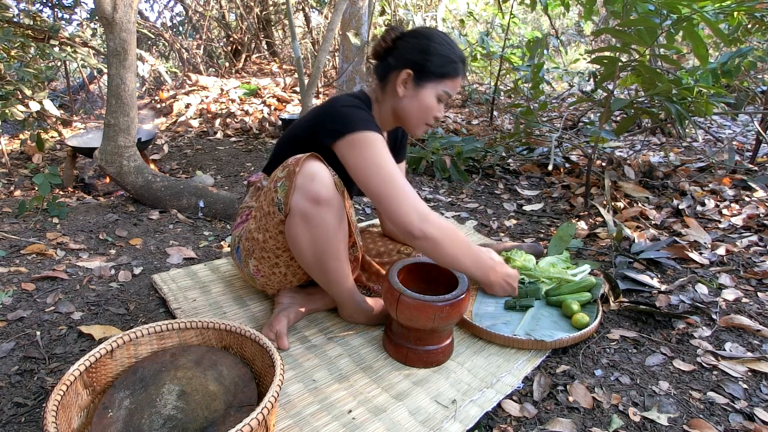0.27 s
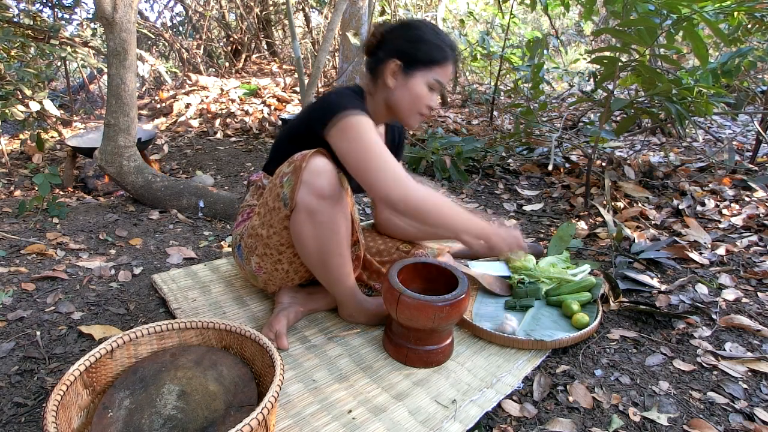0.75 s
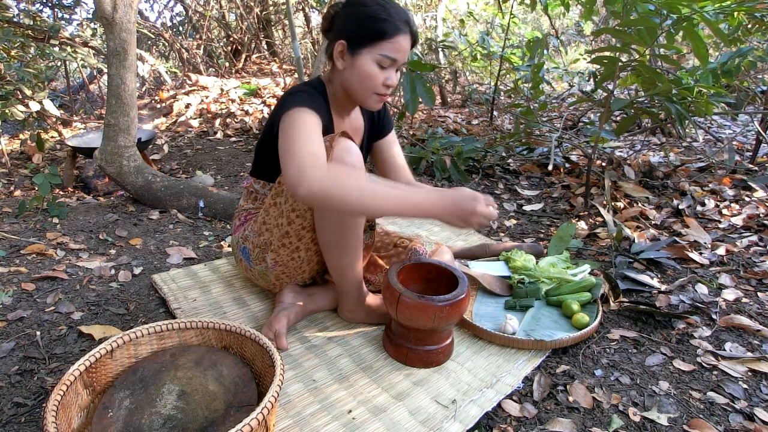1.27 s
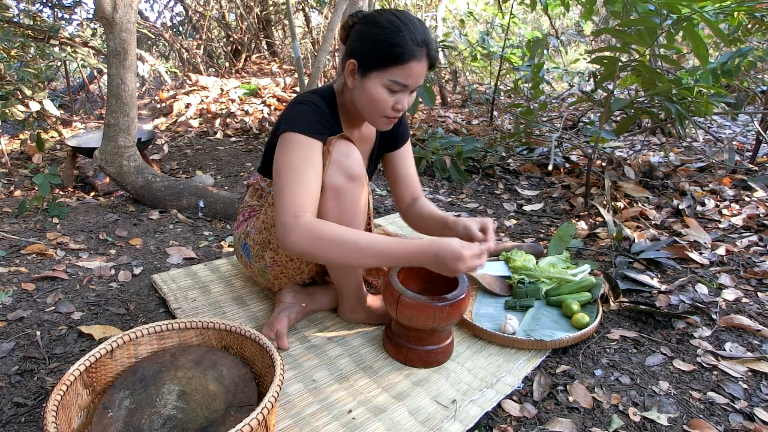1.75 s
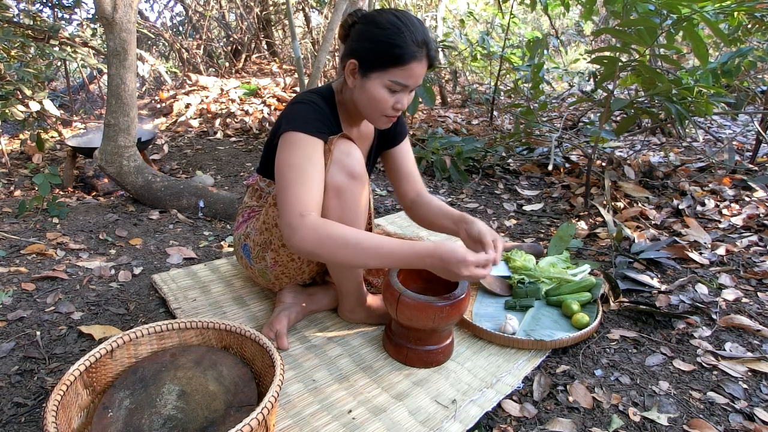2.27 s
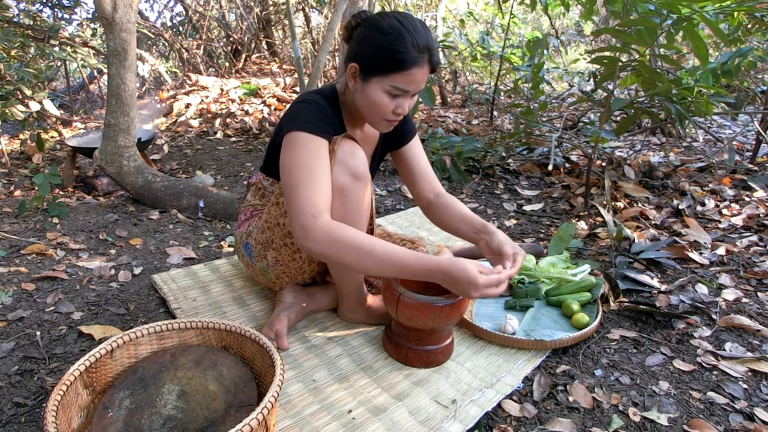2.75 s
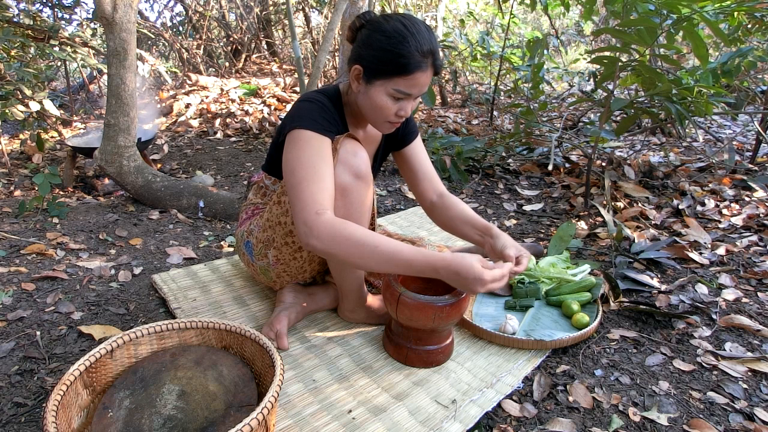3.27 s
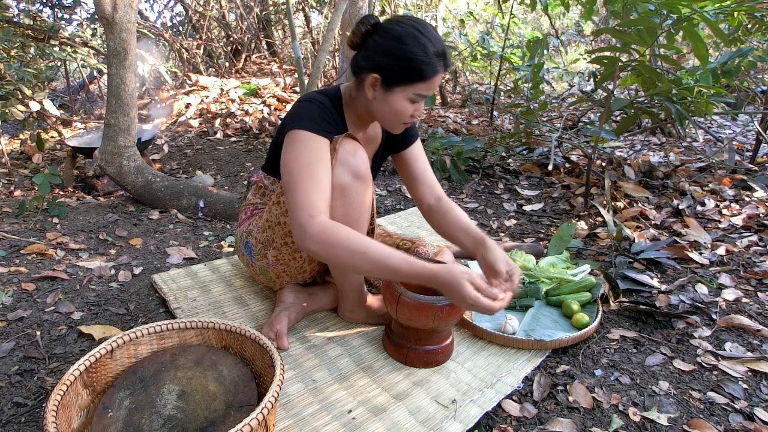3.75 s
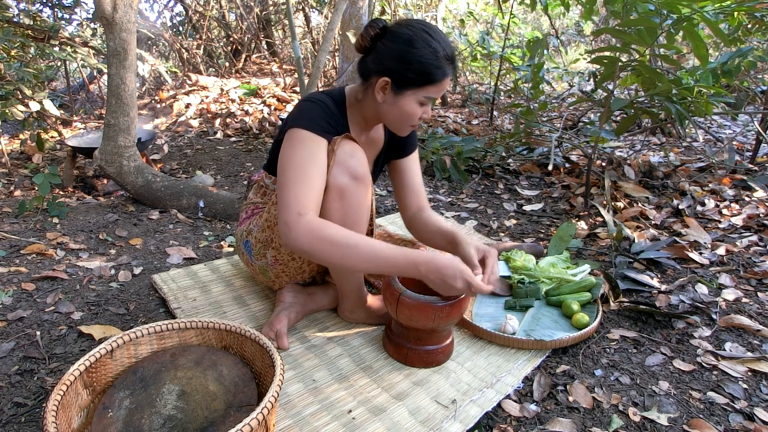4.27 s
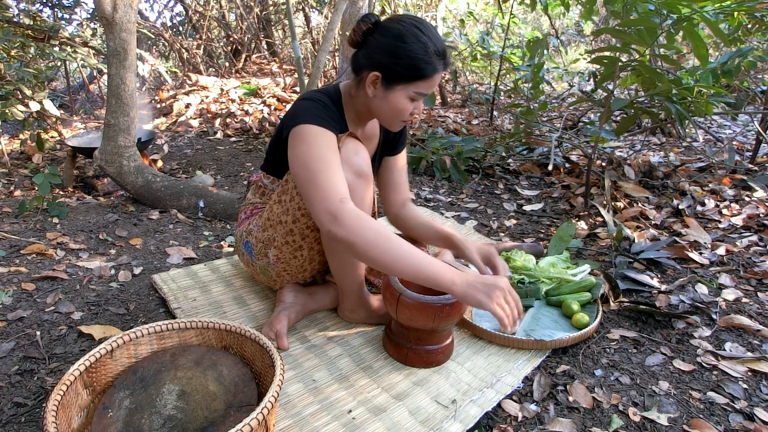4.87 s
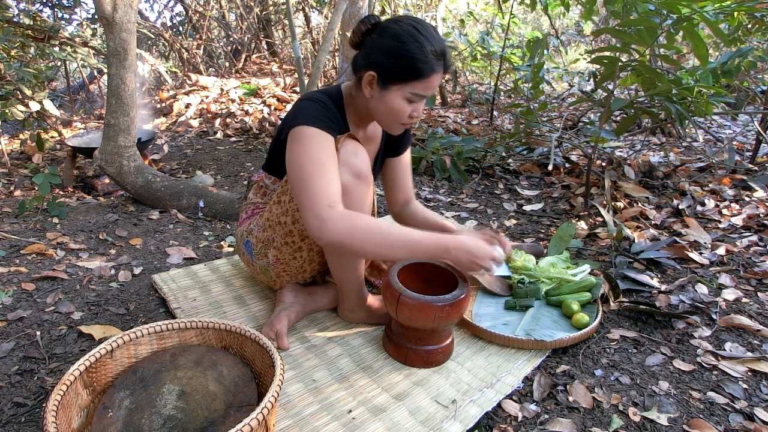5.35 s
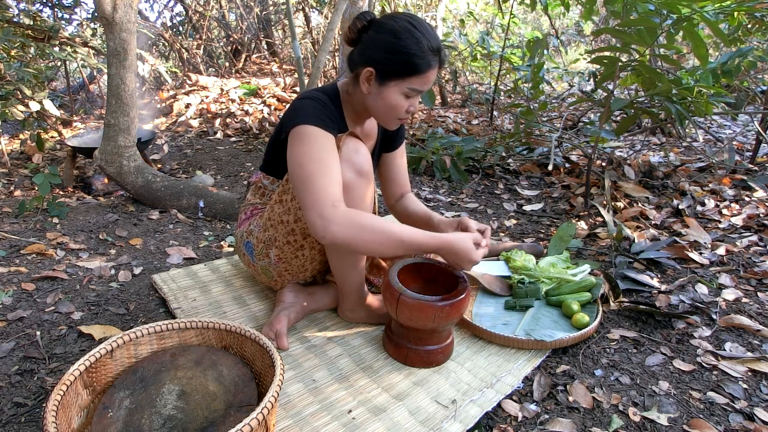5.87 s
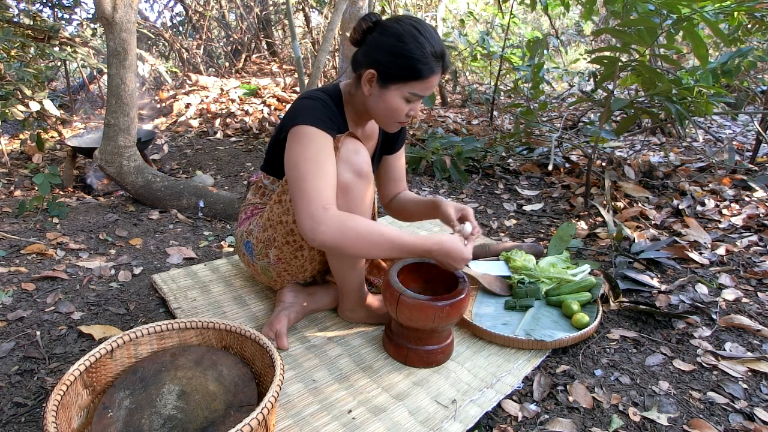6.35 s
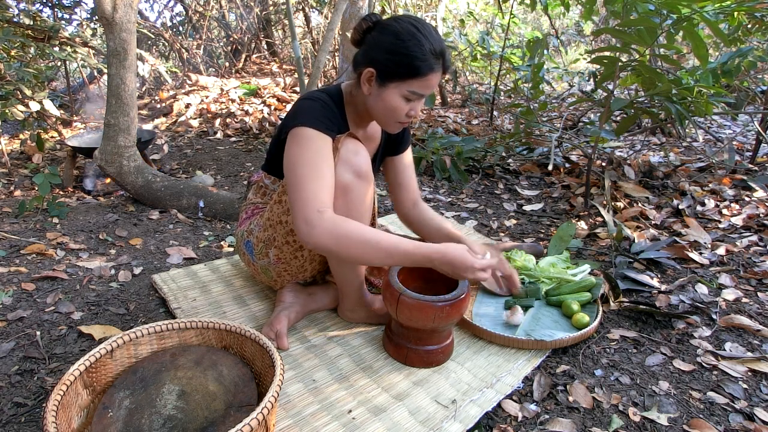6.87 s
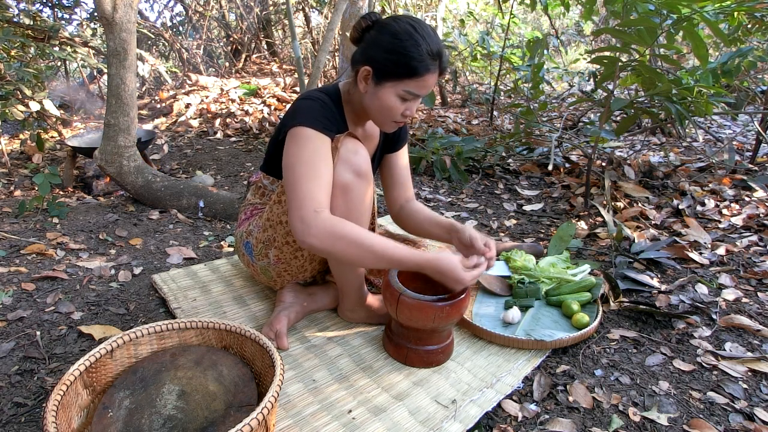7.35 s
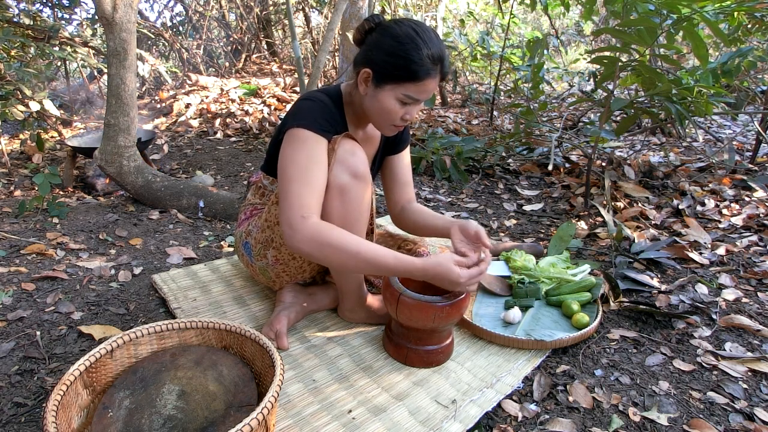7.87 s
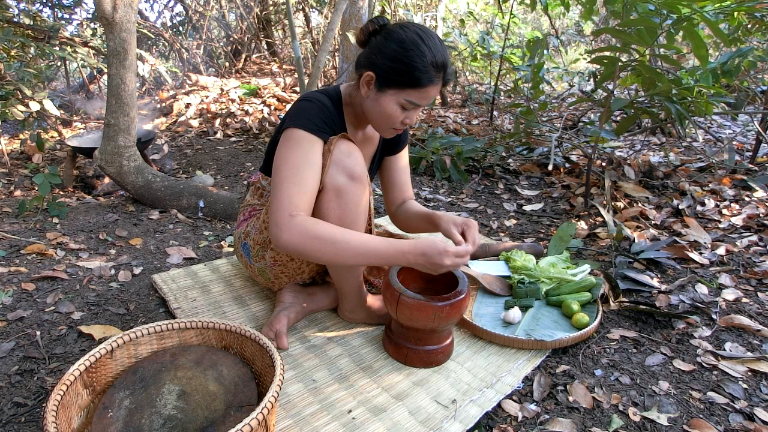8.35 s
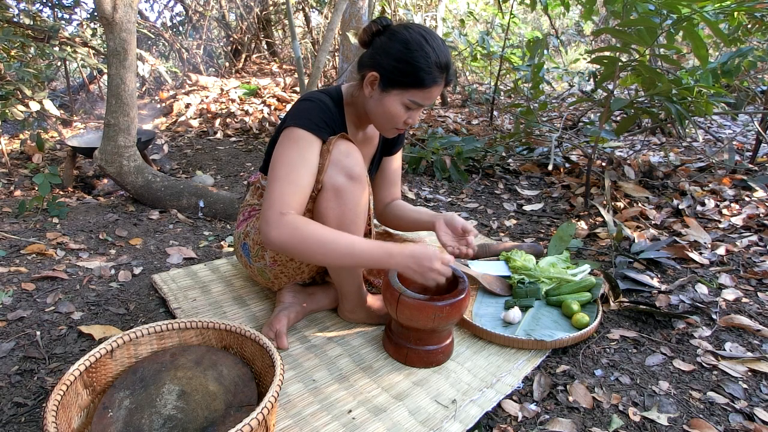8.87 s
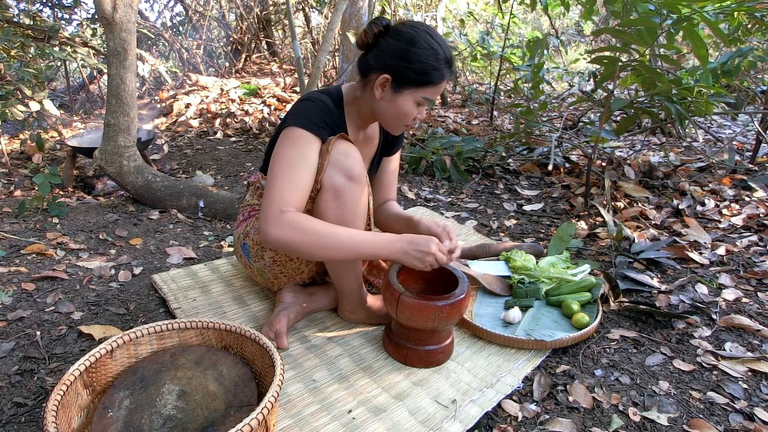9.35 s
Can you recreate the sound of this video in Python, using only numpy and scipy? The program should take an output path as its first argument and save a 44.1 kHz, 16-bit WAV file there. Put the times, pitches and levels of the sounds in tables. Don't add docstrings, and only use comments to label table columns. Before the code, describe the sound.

Papery garlic skins snap and crackle close by while a bird repeats falling whistles and others trill in threes through dry, insect-humming woodland.

```python
import sys
import numpy as np
from scipy import signal
from scipy.fft import rfft, irfft
from scipy.io import wavfile
from scipy.ndimage import uniform_filter1d

SR = 44100
rng = np.random.default_rng(int(sys.argv[2]) if len(sys.argv) > 2 else 0)


def generate_wav(signal):
    frames = np.transpose(np.atleast_2d(signal))
    scaled = np.clip(frames, -1, 1) * 32767
    pcm = np.round(scaled).astype(np.int16)
    wavfile.write(sys.argv[1], SR, pcm)


def voltage_ratio(decibels):
    exponent = np.asarray(decibels, float) / 20
    return 10 ** exponent


N = 423801

# time in seconds, pitch in Hz, level in dB.
TRILL_NOTE = [
    (0, 5600, -31),
    (.004, 5330, 2),
    (.009, 5100, 8.5),
    (.015, 4740, 5),
    (.021, 4540, -0.5),
    (.03, 4140, -9),
]


def colour(x, points):
    hz, db = np.transpose(points)
    f = np.fft.rfftfreq(x.shape[-1], 1 / SR) + 1
    gain_db = np.interp(np.log(f), np.log(hz), db)
    return irfft(rfft(x) * voltage_ratio(gain_db), x.shape[-1])


def band(x, hz, width):
    edges_hz = [hz / width, min(hz * width, .45 * SR)]
    return signal.sosfilt(signal.butter(2, edges_hz, "band", fs=SR, output="sos"), x)


def unit(x):
    return x / np.sqrt(np.mean(x ** 2))


def add(out, s, sound):
    i = int(s * SR)
    sound = sound[..., max(-i, 0):N - i]
    first = max(i, 0)
    out[..., first:first + sound.shape[-1]] += sound


def sing(s, hz, db):
    t = np.arange(int(s[-1] * SR)) / SR
    phase = 2 * np.pi * np.cumsum(np.interp(t, s, hz)) / SR
    return np.sqrt(2) * voltage_ratio(np.interp(t, s, db)) * np.sin(phase)


def leaf_flutter(depth_db, smooth):
    wander = uniform_filter1d(uniform_filter1d(rng.standard_normal(N), size=smooth), size=smooth)
    return voltage_ratio(depth_db * unit(wander))


def trees(x, wet_db, t60, near_db, likeness, bright_db=0):
    pan_db = 2.7
    t = np.arange(SR // 2) / SR
    echo = rng.standard_normal((3, len(t))) * 1000 ** (-t / t60) * np.minimum(t / 0.01, 1)
    echo *= voltage_ratio(wet_db) / np.sqrt(np.sum(echo ** 2) / 3)
    trunks = rng.integers(30, 260, size=6)
    echo[:, trunks] += voltage_ratio(near_db) * rng.uniform(-1, 1, (3, 6))
    likeness = np.clip(likeness, 0, 1)
    echo = np.sqrt(likeness) * echo[2] + np.sqrt(1 - likeness) * echo[:2]
    echo = colour(echo, [(2800, -bright_db), (4000, bright_db)])
    echo[:, 0] = 1
    ports = voltage_ratio(np.array([[pan_db], [-pan_db]]) / 2)
    return signal.fftconvolve(x[None], echo * ports)[:, :N]


def air():
    # frequency in Hz, level in dB per Hz.
    forest_spectrum = [(12, -35), (20, 1.5), (49, -5.5), (96, -2), (156, -7.5), (551, -7.5), (1320, -12),
                       (1560, -8.5), (2580, -13.5), (3720, -13), (4660, -9.5), (6000, -17.5), (9410, -21),
                       (14300, -21), (16500, -58)]
    # frequency in Hz, side minus mid in dB.
    air_width = [(30, 2.5), (80, -8), (250, -3.5), (1000, -2.5), (4000, -1), (12000, 2)]
    level_db = -59.5
    mid, side = colour(rng.standard_normal((2, N)), forest_spectrum[:-1])
    side = colour(side, air_width)
    drift = voltage_ratio(.5 * unit(uniform_filter1d(rng.standard_normal(N), size=SR // 3)))
    ports = np.array([0.79 * (mid + side), 0.76 * (mid - side)])
    return voltage_ratio(level_db - 0.5) * drift / mid.std() * ports


def insects():
    # start in seconds, length in seconds, level in dB.
    buzz_times = [(0.51, 0.069, -76), (.66, 0.032, -77), (4.67, 0.07, -73), (4.808, 0.021, -68),
                  (4.909, 0.037, -70), (5.016, 0.037, -68.5), (5.111, .02, -72), (5.582, 0.067, -75),
                  (5.718, 0.026, -71), (5.796, 0.06, -73), (5.93, 0.023, -69), (6.727, 0.045, -69)]
    gate = np.zeros(N)
    for start, length, db in buzz_times:
        add(gate, start, voltage_ratio(db) * np.hanning(int(length * SR)))
    wingbeat = np.sin(2 * np.pi * 180 * np.arange(N) / SR)
    clicks = rng.standard_normal(N) * (5.9 + wingbeat)
    buzz = gate * unit(band(clicks, 6740, 1.035))
    hum = voltage_ratio(-73.0) * unit(band(rng.standard_normal((2, N)), 9520, 1.04))
    return hum + trees(buzz, wet_db=9.0, t60=0.3, near_db=6.5, likeness=0.06)


def chorus():
    # time in seconds, level in dB, centre pitch in Hz.
    chorus_drift = [(0.0, -51, 4620), (0.96, -66.5, 4640), (1.79, -57.5, 4760), (2.27, -67, 4910),
                    (2.57, -58.5, 4675), (3.88, -58, 4870), (5.57, -63.5, 4390), (7.36, -56.5, 4670),
                    (7.711, -68, 4830), (8.21, -59, 4544), (9.61, -64.5, 4525)]
    out = np.zeros(N)
    s, hz, db = np.transpose(TRILL_NOTE)
    t, level_db, centre_hz = np.transpose(chorus_drift)
    for when, pitch_luck, level_luck in rng.uniform(0, 1, (1100, 3)):
        start = when * N / SR
        pitch = np.interp(start, t, centre_hz) / hz[3] * (.96 + 0.0714 * pitch_luck)
        add(out, start, sing(s, hz * pitch, db + 5 * level_luck))
    swell = voltage_ratio(np.interp(np.arange(N) / SR, t, level_db) - 16.5)
    return trees(unit(out) * swell, wet_db=12.5, t60=0.15, near_db=3.5, likeness=0.11)


def far_birds():
    # start in seconds, length in seconds, first Hz, last Hz, level in dB.
    far_whistles = [(1.13, .12, 3260, 3420, -72), (1.394, .053, 3413, 3650, -66.5),
                    (1.461, .05, 3720, 3950, -68), (2.135, .073, 4120, 3370, -67),
                    (2.197, .11, 2900, 2320, -72), (2.54, .046, 3870, 2990, -69),
                    (2.575, .075, 2880, 2760, -70), (4.03, .17, 4050, 4620, -67),
                    (4.96, .082, 2370, 2170, -71), (5.022, .035, 6150, 4800, -66),
                    (5.158, .066, 2490, 2250, -68), (5.35, .11, 3250, 3080, -70),
                    (5.695, .03, 3000, 1900, -71), (6.132, .084, 3400, 3720, -63.5),
                    (6.485, .04, 3620, 4000, -69), (6.515, .035, 4000, 3900, -66),
                    (6.542, .05, 3850, 3050, -66.5), (6.62, .16, 3080, 3120, -72),
                    (6.848, .055, 3230, 3380, -65), (6.895, .075, 2700, 2900, -68.5),
                    (7.983, .05, 2750, 3020, -67), (8.277, .046, 2850, 3110, -69),
                    (8.355, .07, 3470, 3540, -70.5), (9.162, .076, 4230, 3510, -70),
                    (9.5, .1, 4300, 3000, -71), (.695, .055, 2780, 3000, -67),
                    (.677, .022, 3600, 2780, -69), (.96, .05, 2750, 2950, -72),
                    (7.968, .018, 3400, 2750, -68), (6.805, .05, 2900, 3200, -69),
                    (7.08, .095, 2700, 3100, -75), (8.24, .09, 3300, 3350, -71),
                    (8.87, .04, 2650, 2550, -71), (5.81, .04, 4050, 4200, -69)]
    # start in seconds, length in seconds, middle pitch in Hz, level in dB.
    far_coos = [
        (0.306, 0.072, 676, -72),
        (0.646, 0.1, 688, -75),
        (1.231, 0.064, 1387, -70.5),
        (1.501, 0.041, 1450, -67.5),
        (2.757, 0.028, 1605, -72),
        (2.951, 0.054, 1398, -69.5),
        (3.115, 0.15, 1090, -70),
        (3.588, 0.16, 970, -74),
    ]
    sag = 0.046
    coos = [(s, length, hz * (1 + sag), hz * (1 - sag), db) for s, length, hz, db in far_coos]
    out, u = np.zeros(N), np.linspace(0, 1, num=9)
    for start, length, first_hz, last_hz, db in [*far_whistles, *coos]:
        glide = first_hz + (last_hz - first_hz) * u
        add(out, start, sing(u * length, glide, db - 14 * (2 * u - 1) ** 6))
    out = out * leaf_flutter(3.3, smooth=250)
    return trees(out, wet_db=-1, t60=0.3, near_db=-14, likeness=0.42)


def trill_bird():
    # start in seconds, number of notes, level in dB, pitch factor.
    trill_phrases = [(.368, 3, -58.5, 1), (1.108, 3, -73, 1), (1.555, 3, -75, 1.07), (2.187, 3, -71.5, 1),
                     (2.361, 2, -74, 0.97), (2.434, 4, -59, 0.98), (2.561, 3, -68.5, 1.04),
                     (2.664, 3, -59.5, 0.99), (2.758, 3, -70.5, 0.92), (2.887, 3, -58.5, 0.99),
                     (3.001, 3, -68.5, 0.89), (3.107, 3, -60.5, 0.96), (3.215, 3, -73, 0.86),
                     (3.331, 3, -59.5, 0.97), (3.449, 3, -72, 0.88), (3.699, 1, -64, 0.95),
                     (3.737, 3, -58.5, 1), (3.874, 3, -67, 0.82), (3.967, 3, -57, 1), (4.155, 3, -61, 1.04),
                     (4.385, 3, -59.5, 1.02), (4.618, 3, -58.5, 1.01), (4.853, 3, -60, 1.01),
                     (5.799, 3, -67, 0.96), (6.055, 3, -71, 0.94), (6.6, 3, -76, 0.9),
                     (6.712, 3, -68, 1.03), (6.826, 3, -61, 1.01), (6.915, 3, -66, 0.93),
                     (7.051, 3, -58.5, 1.014), (7.148, 3, -70, 0.89), (7.275, 3, -60, 1),
                     (7.4, 3, -70, 0.92), (7.499, 3, -60.5, 1.01), (7.723, 3, -59, 0.99),
                     (7.884, 2, -70.5, 0.91), (7.95, 3, -59, 0.99), (8.068, 1, -61, 1),
                     (8.105, 3, -60.5, 1.014), (8.194, 3, -74, .94), (8.339, 3, -61.5, 1.024),
                     (8.576, 3, -59.5, 0.99), (8.807, 3, -60.5, 1), (9.033, 3, -69.5, 0.95)]
    note_gap_s = .037
    wet_per_db = .5
    out = np.zeros((2, N))
    s, hz, db = np.transpose(TRILL_NOTE)
    lucks = rng.standard_normal((len(trill_phrases), 6))
    for (start, notes, level_db, pitch), luck in zip(trill_phrases, lucks):
        phrase = np.zeros(SR // 4)
        direct_db = level_db + wet_per_db * (level_db + 64.0) / 2
        for k in range(round(notes)):
            add(phrase, k * note_gap_s, sing(s, hz * pitch, db + direct_db + 1.7 * luck[k]))
        wet_db = -1.2 - wet_per_db * (level_db + 58.0)
        add(out, start, trees(phrase, wet_db, t60=0.13, near_db=-7.5, likeness=0.15))
    return out


def near_bird():
    # start of the fall in seconds, fall length factor, top pitch in Hz, level in dB,
    # extra level of the flat opening in dB.
    falling_whistles = [(0.025, 1.11, 4480, -53.5, 9), (.412, 1.07, 4590, -51.5, 2.5),
                        (0.824, 0.96, 4590, -53, 2.5), (1.214, 1, 4590, -52, 5.5),
                        (1.66, 0.98, 4510, -53, 4), (3.591, 0.88, 4530, -51.5, -2),
                        (3.962, 0.94, 4600, -50, 0), (4.318, 1.18, 4484, -52, 2.5),
                        (4.687, 1.08, 4540, -47, 0), (5.095, 1.02, 4400, -49, 0),
                        (5.469, 1.0, 4500, -49, 3), (5.872, 1, 4390, -45.5, -0.5),
                        (7.737, 0.82, 4730, -50, -4), (8.113, 0.91, 4570, -44.5, -3.5),
                        (8.462, 0.9, 4555, -49.5, -4), (8.898, 0.97, 4706, -52.5, -1),
                        (9.268, 0.83, 4430, -51, 5.5)]
    # share of the way from shelf to top pitch, level in dB.
    whistle_shape = [
        (0.7, -14),
        (1.0, -4),
        (0.92, -2),
        (.62, 2),
        (.22, 3),
        (.1, 2.5),
        (0, 1.5),
        (-0.08, -3),
        (-0.34, -14),
    ]
    shelf_hz, shelf_end_s, shelf_stretch_s = 2809, 0.053, 0.02
    lead_s = .026
    turn = 0.71
    far_wet_per_db = .35
    out = np.zeros((2, N))
    share, db = np.transpose(whistle_shape)
    flutter = leaf_flutter(2.4, smooth=200)
    for knee, fall, top_hz, level_db, opening_db in falling_whistles:
        end = shelf_end_s + shelf_stretch_s * (fall - 1)
        falling = np.array([.009, .021, .034]) * fall
        s = lead_s + np.r_[-.026, -.016, 0, falling, end + .007, end + .012, end + .019]
        facing_db = opening_db * ((s < .027) - turn * (s > lead_s + end))
        call = sing(s, shelf_hz + share * (top_hz - shelf_hz), db + level_db + facing_db)
        call = call * flutter[int(knee * SR):][:len(call)]
        wet_db = -4.5 - far_wet_per_db * (level_db + 48)
        heard = trees(call, wet_db, t60=0.26, near_db=-8, likeness=0.36, bright_db=5)
        add(out, knee - lead_s, heard)
    return out


def mortar_knock():
    # start in seconds, level in dB, first Hz, last Hz, length in seconds.
    clove_drop = (4.8135, -41, 800, 560, .007)
    out = np.zeros((2, N))
    s, db, first_hz, last_hz, length = clove_drop
    ring_db = db + np.array([-43, -1.0, -6.5, -21])
    add(out, s, sing(length * np.array([0, .2, .6, 1]), np.linspace(first_hz, last_hz, num=4), ring_db))
    return out


def crackle(spread_db, rate, likeness):
    sizes = voltage_ratio(spread_db * np.minimum(rng.exponential(size=N), 3))
    sizes = sizes * (rng.uniform(size=N) < rate / SR)
    shared, left, right = rng.standard_normal((3, N))
    hiss = likeness * shared + np.array([left, right])
    return unit(hiss * (.5 + uniform_filter1d(sizes, size=12) * 3))


def rustle_level():
    # time in seconds, level in dB.
    rubbing = [(0., -69), (.13, -48.5), (.3, -56.5), (.83, -64.5), (1.45, -61), (1.82, -66), (1.93, -57),
               (2.09, -64), (3.05, -63), (3.72, -60), (5.4, -64), (6.21, -64), (6.4, -63.5), (6.58, -64),
               (7.44, -63), (7.7, -65), (9.15, -62.5), (9.61, -65.5)]
    s, db = np.transpose(rubbing)
    return voltage_ratio(np.interp(np.arange(N) / SR, s, db))


def tears(fibres):
    # start in seconds, length in seconds, level in dB, colour in Hz.
    torn_skins = [(0.128, 0.03, -50, 7300), (6.29, 0.029, -59, 106), (7.552, 0.047, -43.5, 9500),
                  (7.538, .014, -50, 9000), (4.39, .04, -43, 10800), (.118, .02, -47, 8000),
                  (2.506, .035, -48, 13500), (2.625, .04, -59, 9000), (4.345, 0.014, -52, 9000),
                  (7.004, 0.13, -69, 10400), (0.182, 0.067, -42.5, 5800), (0.195, 0.05, -43, 2800),
                  (0.185, 0.044, -39.5, 4000), (0.325, 0.028, -52, 8200), (1.25, 0.059, -58, 9900),
                  (1.856, 0.16, -49, 9700), (2.508, 0.21, -59, 12000), (3.568, 0.11, -46.5, 4700),
                  (3.577, 0.1, -42, 10600), (4.355, 0.19, -58, 10200), (6.258, 0.039, -56, 7100),
                  (6.293, 0.09, -50, 12000), (6.29, 0.071, -47.5, 3170), (6.294, 0.026, -35, 12000),
                  (.202, 0.028, -38, 2300), (1.455, .035, -59, 10000), (1.532, .03, -60, 12000),
                  (.088, .03, -55, 11000), (.38, .04, -58, 9000), (3.97, .03, -58, 10000),
                  (6.262, .02, -52, 4000), (6.31, .06, -48, 6500), (2.995, .03, -58, 12000),
                  (3.588, 0.069, -41.5, 6300), (3.588, 0.063, -38.5, 12600), (8.575, .05, -47, 13000),
                  (4.35, 0.027, -51, 8200), (7.403, 0.028, -60, 850), (7.422, 0.035, -47, 10000),
                  (8.558, 0.091, -45, 10800), (8.623, 0.032, -52, 9400), (9.215, 0.041, -49, 9700)]
    out = np.zeros((2, N))
    for s, length, db, hz in torn_skins:
        piece = fibres[:, int(s * SR):int((s + length) * SR)]
        swell = np.sin(np.pi * np.linspace(0, 1, piece.shape[1]) ** 0.48)
        ringing = band(band(piece, hz, 1.42), hz, 1.42)
        add(out, s, voltage_ratio(db) * unit(ringing) * swell)
    return out


def ticks():
    # start in seconds, peak in dB, colour in Hz.
    fibre_ticks = [(.1152, -29, 6500), (.1296, -29, 7500), (.189, -25, 9000), (.2195, -21.5, 3000),
                   (1.2105, -39, 9000), (1.2296, -31, 9000), (1.2478, -32, 10000), (1.2942, -38, 9000),
                   (1.3173, -38, 9000), (1.8718, -25, 8990), (1.9155, -28, 9000), (2.5116, -36, 13400),
                   (2.648, -50, 9000), (2.957, -47, 8000), (6.429, -46, 8500), (4.3535, -29, 8980),
                   (3.5757, -29, 9000), (3.5913, -23, 7000), (3.6015, -24, 8000), (3.604, -23, 13000),
                   (3.6125, -25, 8000), (4.3581, -26, 8500), (4.3913, -28, 8000), (4.4011, -24, 9000),
                   (4.4034, -19, 12000), (6.295, -17, 12000), (6.2973, -21, 13000), (6.3066, -22, 12000),
                   (7.5498, -28, 9000), (7.5597, -26, 9000), (8.5365, -25, 11000), (8.5894, -29, 12000),
                   (8.5974, -23, 12000), (9.012, -42, 3500)]
    out, t = np.zeros((2, N)), np.arange(300) / SR
    bursts = rng.standard_normal((len(fibre_ticks), 3, len(t)))
    for (s, db, hz), burst in zip(fibre_ticks, bursts):
        burst = burst[:2] + 1.6 * burst[2]
        tick = band(burst * 1000 ** (-t / .003), hz, 1.6)
        add(out, s, voltage_ratio(db - 1.5) * tick / np.abs(tick.mean(axis=0)).max())
    return out


def skin_breaks():
    # start in seconds, peak in dB, thump in dB, colour in Hz.
    clean_snaps = [(0.0957, -42, -69, 11400), (0.1134, -24, -62, 6220), (0.1555, -35, -62, 10500),
                   (0.191, -25, -67, 5230), (0.1948, -23, -71, 5500), (1.1047, -46, -76, 9500),
                   (1.3024, -29, -69, 6350), (1.7659, -15, -47.5, 9850), (1.9176, -22, -52.5, 10500),
                   (2.506, -29.5, -79, 13640), (3.1734, -19.5, -48, 7460), (3.265, -14.5, -49, 8200),
                   (3.5098, -41, -69, 8050), (3.6625, -36, -59, 9000), (4.051, -47, -69, 9200),
                   (5.964, -32, -65, 8900), (6.1629, -26, -55, 13300), (6.278, -27, -58, 4970),
                   (6.2846, -19, -60, 7300), (6.2858, -23, -49, 7300), (6.2912, -9, -37, 7650),
                   (6.293, -15, -50, 3980), (7.0943, -41, -65, 7800), (7.298, -34.5, -70, 9430),
                   (7.4049, -15, -35.5, 11200), (7.4222, -22.5, -49, 8800), (7.521, -42, -78, 8100),
                   (7.5452, -31, -75, 8000), (7.5513, -17.5, -60, 8400), (8.4742, -33, -64, 12300),
                   (8.5145, -55, -72, 13900), (8.533, -19.5, -45.5, 10700), (8.5356, -36, -60, 12000),
                   (8.564, -44, -70, 12000), (8.5684, -24, -58, 12300), (9.2208, -28, -76, 9400),
                   (9.2383, -30, -77, 11900)]
    # start in seconds, peak in dB, thump in dB, colour in Hz.
    crunches = [(0.1854, -27, -62, 11000), (0.219, -26, -52, 5500), (0.314, -44, -62, 8180),
                (0.505, -50, -60, 6100), (1.2181, -31.5, -72, 9200), (1.3587, -37.5, -73, 9960),
                (1.456, -53, -66, 11260), (1.867, -20, -62, 9400), (2.0527, -34.5, -55, 12400),
                (2.9953, -47, -55, 13300), (3.337, -37, -55, 9630), (3.4923, -37.5, -59, 9390),
                (3.5576, -33.5, -74, 7400), (3.5676, -29.5, -70, 12000), (3.5934, -23, -56, 13000),
                (4.1922, -46, -70, 12100), (4.3527, -30, -71, 8320), (4.3966, -25, -68, 9000),
                (6.0319, -43.5, -53, 10400), (6.2146, -41.5, -63, 10500), (6.2325, -46, -58, 5000),
                (6.2715, -34, -66, 6340), (6.427, -56, -80, 9990), (8.585, -33.5, -54, 13590),
                (8.6, -36, -54, 12400), (8.6432, -29, -60, 7000), (8.906, -41, -52, 13920),
                (8.942, -34, -49, 10300), (9.178, -42.5, -80, 11400), (9.413, -45, -66, 13130)]
    # dB under the peak of a -30 dB break, and decay time in seconds
    snap_tail, crunch_tail = (-18, 0.14), (-7.5, 0.11)
    tail_slope = 0.87
    push_db = 20
    cracks, thumps, tail = np.zeros((2, N)), np.zeros((2, N)), np.zeros(N)
    t = np.arange(SR // 5) / SR
    breaks = [(*row, *snap_tail) for row in clean_snaps]
    breaks = sorted(breaks + [(*row, *crunch_tail) for row in crunches])
    bursts = rng.standard_normal((len(breaks), 3, len(t)))
    for (s, db, thump_db, hz, tail_db, t60), burst in zip(breaks, bursts):
        burst = burst[:2] + 1.6 * burst[2]
        crack = burst * (1000 ** (-t / .0022) + .27 * 1000 ** (-t / .016))
        crack = crack + 1.35 * band(crack, hz, 1.42)
        add(cracks, s + .0009, voltage_ratio(db + 2.5) * crack / np.abs(crack.mean(axis=0)).max())
        rattle = burst[:, ::-1] * 1000 ** (-t / 0.02)
        add(thumps, s + 0.000786, voltage_ratio(thump_db + 1.5) * (rattle + voltage_ratio(push_db) * (t == 0)))
        peak_db = tail_db - 29.5 + tail_slope * (db + 30)
        add(tail, s + 0.00074, voltage_ratio(peak_db) * 1000 ** (-t / max(t60, .01)))
    return cracks, thumps, tail


def garlic():
    # frequency in Hz, level in dB per Hz.
    skin_colour = [(180, -28), (300, -16), (717, -13.5), (1720, -13.5), (1900, -11.5), (3090, -8),
                   (5550, 0.5), (12800, 2), (15400, 0), (16500, -74)]
    cracks, thumps, tail = skin_breaks()
    fibres = crackle(spread_db=2.5, rate=1500., likeness=0.9)
    out = cracks + (tail + rustle_level()) * fibres + ticks()
    out = colour(out, skin_colour)
    out += tears(fibres)
    out += colour(thumps, [(40, 4.0), (150, 8.0), (600, 4.5), (1500, 3.5), (3000, 4.5), (8000, -5)])
    out += mortar_knock()
    out[0] = np.roll(out[0], shift=1)
    return out * voltage_ratio(np.array([[1.3], [-1.3]]))


def scene():
    forest = air() + insects() + chorus() + far_birds()
    return forest + trill_bird() + near_bird() + garlic()


def top_cut(x):
    return signal.sosfilt(signal.butter(12, 16810, fs=SR, output="sos"), x)


def record(dry):
    keep = np.exp(-1 / (.35 * SR))
    power = signal.lfilter([1 - keep], [1, -keep], np.mean(dry ** 2, axis=0))
    gain = (1 + power / voltage_ratio(-99.0)) ** -.08
    mix = 0.48 * np.tanh(dry * gain / 0.42)
    return top_cut(mix)


dry = scene()
out = record(dry)
generate_wav(out)
```